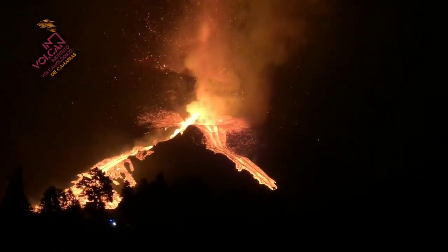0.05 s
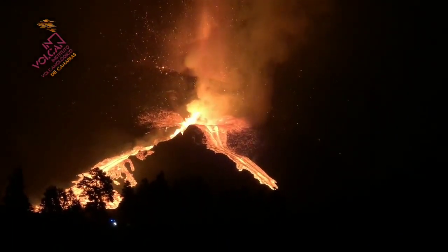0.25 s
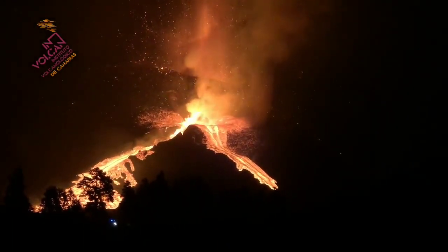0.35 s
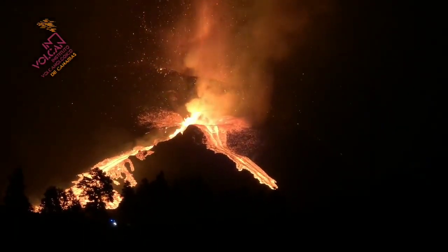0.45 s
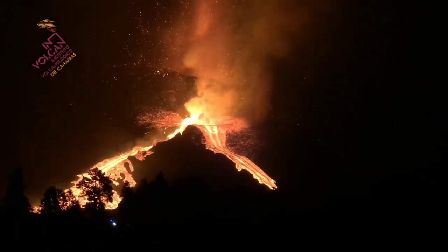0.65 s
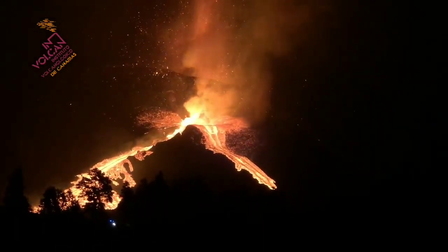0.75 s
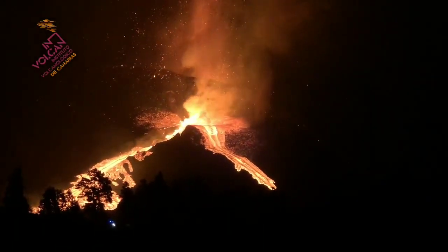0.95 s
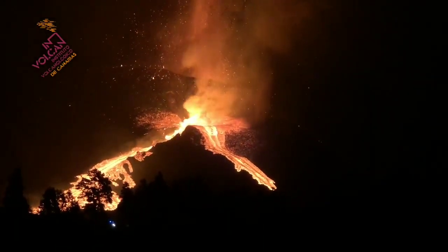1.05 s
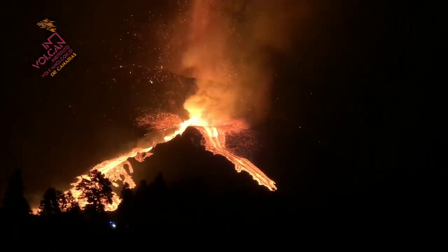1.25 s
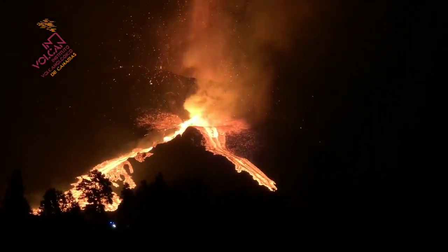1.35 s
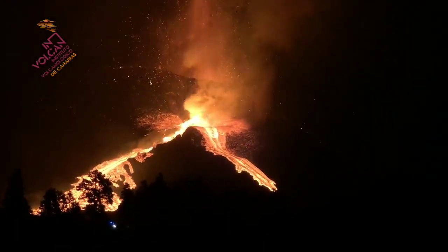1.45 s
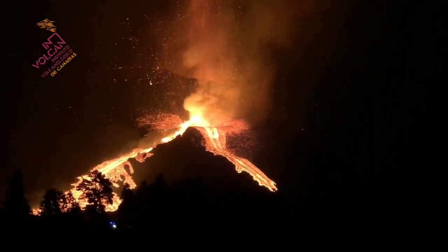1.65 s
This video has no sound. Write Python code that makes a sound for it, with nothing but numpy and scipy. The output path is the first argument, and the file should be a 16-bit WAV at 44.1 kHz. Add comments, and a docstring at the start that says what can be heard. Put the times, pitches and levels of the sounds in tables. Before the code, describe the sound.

An erupting volcano's hollow roar swells once and dies down, heard from far off in the open at night. A low boom and deep rumble rise and sink with it, with brief hoots from the vent around the peak.

```python
"""A volcano's gas jet roars in the distance, outdoors at night.
The turbulent flow builds to one surge and falls back; its passage through the air leaves a dull
roar, made hollow by a few broad resonances. A low boom swells and sinks, gusts excite brief hoots
in the vent, and the large eddies of the plume rumble beneath.
Faint night air and microphone hiss form the background."""
import sys
import numpy as np
from scipy import signal
from scipy.fft import rfft, irfft
from scipy.io import wavfile
from scipy.ndimage import uniform_filter1d, map_coordinates

SR = 44100
rng = np.random.default_rng(int(sys.argv[2]) if len(sys.argv) > 2 else 0)


def log_audio(samples):
    """Write samples as a 16-bit WAV file to the path given in sys.argv[1]."""
    # one column per channel
    frames = np.atleast_2d(samples).T
    # limit to full scale, then quantise
    limited = np.clip(frames, -1, 1)
    pcm = np.round(limited * 32767).astype(np.int16)
    wavfile.write(sys.argv[1], SR, pcm)


N = 74970

# Strength of the gas jet: time_s, level_db
JET_THRUST = [(0, -47), (0.08, -47), (0.3, -41), (0.45, -40.5), (0.6, -37.5), (0.70, -35), (0.742, -30),
              (0.8, -30.5), (0.88, -28), (0.93, -27.5), (1.02, -27.5), (1.1, -29), (1.22, -32), (1.35, -38),
              (1.5, -43.5), (1.6, -44), (1.65, -46.5), (1.7, -45.5)]
# Jet turbulence after its passage through the air: frequency_hz, relative_db
JET_SPECTRUM = [(150, -42), (290, -5), (350, -3), (570, -3), (690, -8.5), (1000, -9), (1400, -14),
                (1700, -16), (1920, -22.5), (2350, -28.5), (2850, -37), (3300, -46.5), (3900, -63.5),
                (6000, -100)]
# Broad resonances that make the roar hollow: centre_hz, width_hz, lift_db
JET_RESONANCES = [(457, 43, 3.5), (521, 51, 3), (800, 180, 5.5), (1186, 300, 4), (1646, 110, 2)]
# Swell of the boom: time_s, relative_db
BOOM_ENVELOPE = [(0, -51.5), (0.1, -49.5), (0.22, -45.5), (0.32, -42.5), (0.42, -45), (0.55, -43),
                 (0.72, -39), (0.75, -35.5), (0.82, -35.5), (0.91, -29.5), (0.998, -38), (1.109, -33.5),
                 (1.199, -35.5), (1.28, -39), (1.339, -44), (1.55, -48.5), (1.7, -47.5)]
# Noise band of the boom before its glide: frequency_hz, relative_db
BOOM_SPECTRUM = [(90, -47.5), (135, -9.5), (160, -3), (184, -2), (200, -2.5), (262, 0.5), (296, -7.5),
                 (400, -34.5), (1000, -96)]
# Centre of the boom, sinking as the surge is spent: time_s, pitch_hz
BOOM_GLIDE = [(0, 229.1), (0.65, 217.7), (0.9, 222), (1.12, 215), (1.27, 180.6), (1.45, 192.9),
              (1.7, 203.5)]
# Gusts ringing the vent: peak_s, half_power_length_s, pitch_hz, level_db
VENT_HOOTS = [(0.224, 0.03, 245, -39.5), (0.758, 0.018, 829, -31.5), (0.861, 0.05, 469.8, -32),
              (0.958, 0.052, 490.8, -29.5), (1.038, 0.025, 218.9, -25), (1.077, 0.029, 460.3, -29.5),
              (1.118, .06, 232, -29), (1.647, 0.025, 495, -42.5)]
# Swell of the rumble: time_s, relative_db
RUMBLE_ENVELOPE = [(0, -51.5), (0.16, -52), (0.23, -45.5), (0.31, -44.5), (0.42, -47), (0.58, -42.5),
                   (0.72, -47.5), (0.8, -40.5), (0.97, -36.5), (1.04, -42), (1.2, -43.5), (1.35, -54.5),
                   (1.53, -55.5), (1.7, -58)]
# Deep noise of the plume: frequency_hz, relative_db
RUMBLE_SPECTRUM = [(24, -26.5), (40, -5.5), (52, -2), (62, -1), (71, 2.5), (82, 0.5), (103, -4), (116, 0),
                   (160, -7.5), (600, -99.5)]
# Far-off wash of the night air: frequency_hz, relative_db
AIR_SPECTRUM = [(100, -3), (1500, 0), (2200, -10), (3000, -21), (3700, -30.5), (6000, -60.5)]
# Self-noise of the microphone: frequency_hz, relative_db
HISS_SPECTRUM = [(100, -3), (3500, 0), (5000, -1.5), (8000, -3.5), (12500, -8), (14000, -4)]


def gas_jet():
    """Source and filter: turbulent noise excites fixed resonances; thrust makes it loud and bright."""
    frame, hop = 2048, 256
    treble_lag_s, pivot_hz = 0.077, 700
    hz, t, spectra = signal.stft(noise(JET_SPECTRUM), SR, nperseg=frame, noverlap=frame - hop)
    resonance_db = sum(db / (1 + (2 * (hz - centre) / width) ** 2)
                       for centre, width, db in JET_RESONANCES)
    thrust_db = curve(JET_THRUST, t)
    # Treble slope in dB per octave: it rises with thrust and, slowly, with time.
    tilt = 0.096 * (thrust_db - thrust_db.mean()) + 1.4 * (t - t.mean())
    tilt += 0.08 * (curve(JET_THRUST, t - treble_lag_s) - thrust_db)  # the treble follows late
    octaves = np.log2(np.maximum(hz / pivot_hz, 1))
    gain = amp(resonance_db + tilt[:, None] * octaves + eddies(spectra.T.shape, frame, hop))
    roar = signal.istft(spectra * gain.T, nperseg=frame, noverlap=frame - hop)[1][:N]
    return impose_envelope(roar, JET_THRUST, window_samples=2000)


def eddies(shape, frame, hop, depth_db=0.86, life_s=0.04, width_hz=200):
    """Turbulent modulation: the level fluctuates, in dB, over patches of time and frequency."""
    patches = uniform_filter1d(rng.standard_normal(shape), round(life_s * SR / hop), axis=0)
    patches = uniform_filter1d(patches, round(width_hz * frame / SR), axis=1)
    return depth_db * unit_rms(patches)


def boom(nominal_hz=220, gain_db=1.7):
    """Resonance: the lowest band of the roar swells with the surge and sinks in pitch after it."""
    position = np.cumsum(curve(BOOM_GLIDE, np.arange(N) / SR) / nominal_hz)  # slower reading is lower
    gliding = map_coordinates(noise(BOOM_SPECTRUM), [position], order=3, mode="wrap")
    return amp(gain_db) * impose_envelope(gliding, BOOM_ENVELOPE, window_samples=2000)


def vent_hoots(waver_rms_hz=33.55):
    """Flow-excited resonance: each gust rings one unsteady tone under a Gaussian envelope."""
    t, hoots = np.arange(N) / SR, np.zeros(N)
    for peak_s, length_s, pitch_hz, level_db in VENT_HOOTS:
        waver = unit_rms(uniform_filter1d(rng.standard_normal(N), round(SR / pitch_hz)))
        phase = 2 * np.pi * np.cumsum(pitch_hz + waver_rms_hz * waver) / SR
        swell = 0.5 ** (2 * ((t - peak_s) / length_s) ** 2)
        hoots += amp(level_db) * swell * unit_rms(np.sin(phase))
    return hoots


def plume_rumble(gain_db=-0.5):
    """Eddy scale: the large, slow eddies of the plume radiate the lowest frequencies."""
    return amp(gain_db) * impose_envelope(noise(RUMBLE_SPECTRUM), RUMBLE_ENVELOPE, window_samples=3600)


def background(air_db=-56, hiss_db=-79.5):
    """Stationary noise: night air and microphone self-noise make a steady floor."""
    return amp(air_db) * noise(AIR_SPECTRUM) + amp(hiss_db) * noise(HISS_SPECTRUM)


def noise(spectrum):
    """Spectral shaping: white noise takes on a spectrum drawn over log frequency, at unit rms."""
    hz, db = np.transpose(spectrum)
    bins_hz = np.fft.rfftfreq(N, 1 / SR)
    gain = amp(np.interp(np.log(bins_hz + 1), np.log(hz + 1), db))
    return unit_rms(irfft(rfft(rng.standard_normal(N)) * gain, N))


def impose_envelope(x, levels, window_samples):
    """Amplitude modulation: a level curve replaces the signal's own slow drift in power."""
    power = uniform_filter1d(uniform_filter1d(x ** 2, window_samples), window_samples)
    return x / np.sqrt(power + 1e-12) * amp(curve(levels, np.arange(N) / SR))


def curve(points, t):
    """Linear interpolation of a control at times t."""
    return np.interp(t, *np.transpose(points))


def amp(db):
    """Decibel law: 20 dB is a tenfold amplitude."""
    return 10 ** (np.asarray(db) / 20)


def unit_rms(x):
    """Normalisation to a mean power of one."""
    return x / np.sqrt(np.mean(x ** 2) + 1e-20)


def scene():
    """Superposition: the pressures of all sources add in one channel."""
    return (gas_jet() + boom() + vent_hoots() + plume_rumble() + background())[None]


def record(dry, low_cut_hz=24, high_cut_hz=13900, fade_s=0.004):
    """Band limiting: filters remove the extreme bass and treble, and short fades soften the ends."""
    highpass = signal.butter(6, low_cut_hz, "highpass", fs=SR, output="sos")
    lowpass = signal.firwin(511, high_cut_hz, window=("kaiser", 9), fs=SR)
    fades = signal.windows.tukey(N, 2 * fade_s * SR / N)
    return signal.oaconvolve(signal.sosfilt(highpass, dry) * fades, lowpass[None], "same")


dry = scene()
out = record(dry)
log_audio(out)
```